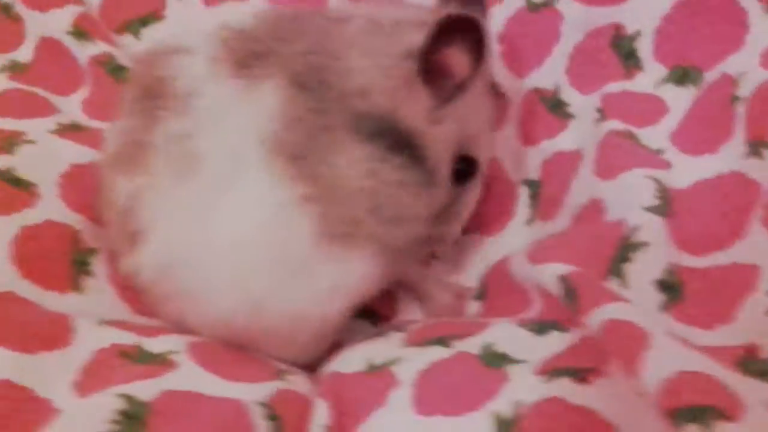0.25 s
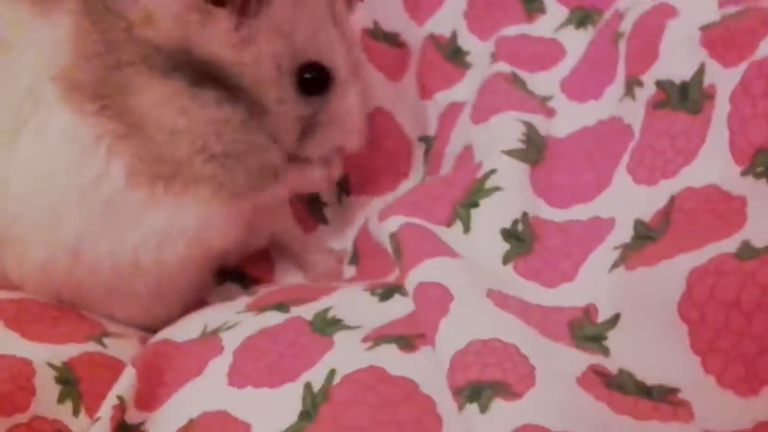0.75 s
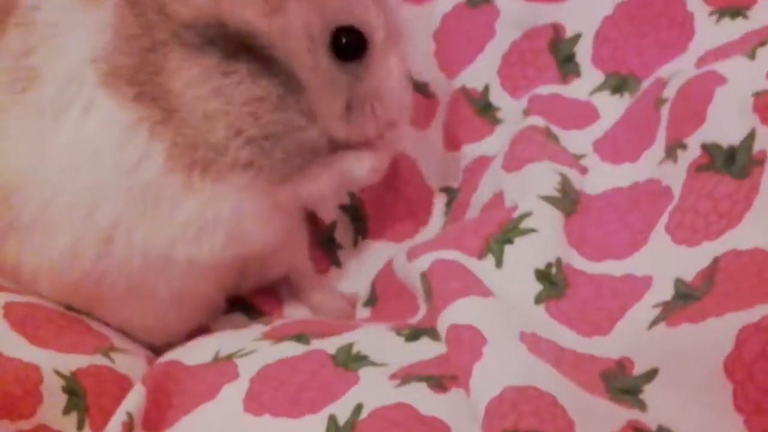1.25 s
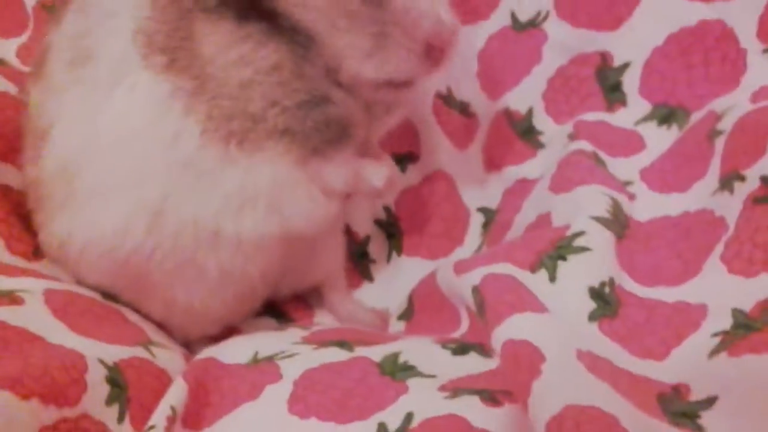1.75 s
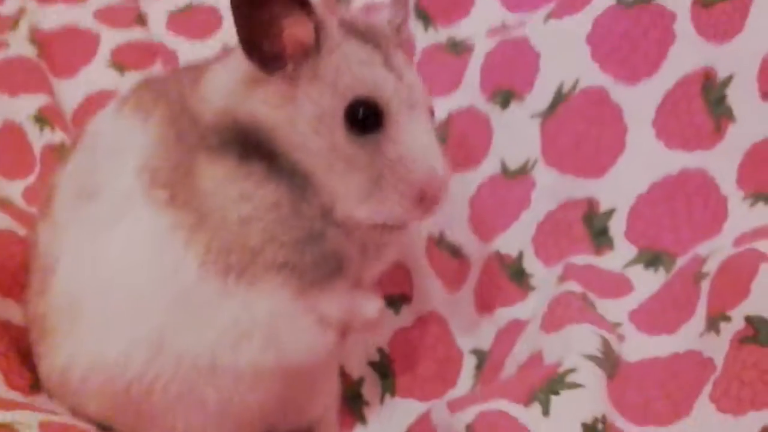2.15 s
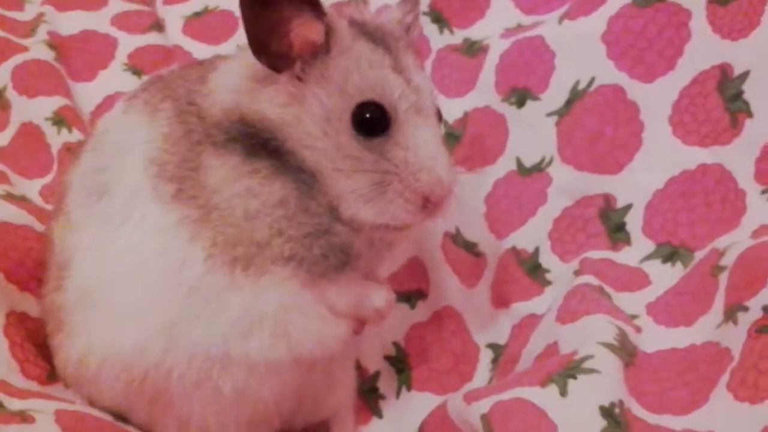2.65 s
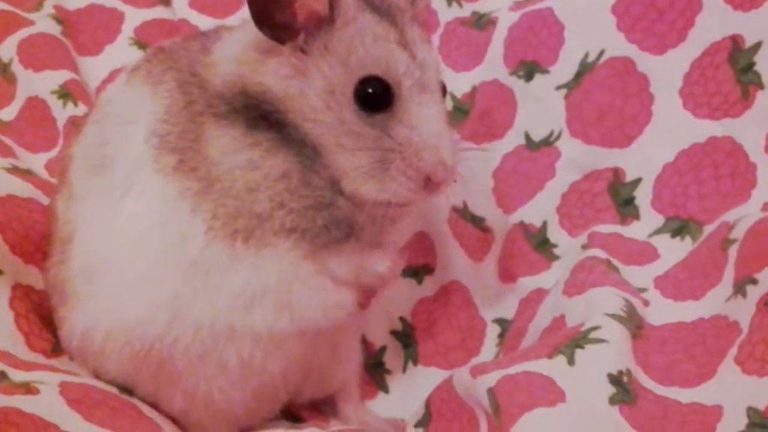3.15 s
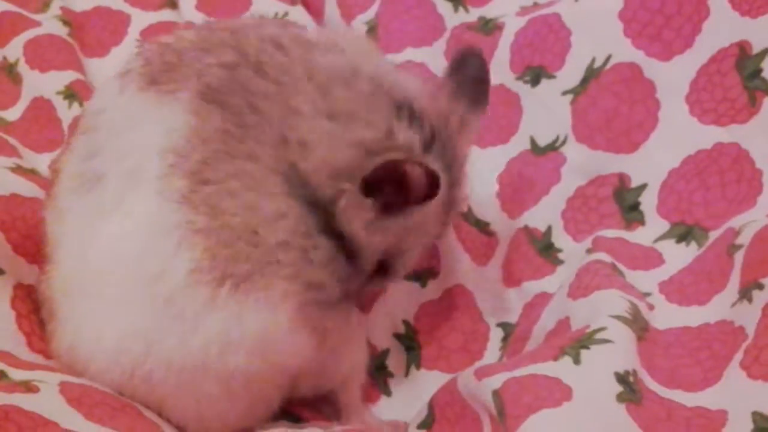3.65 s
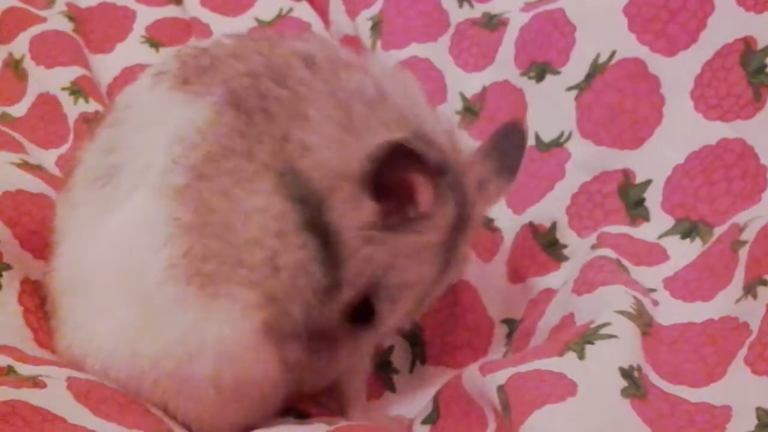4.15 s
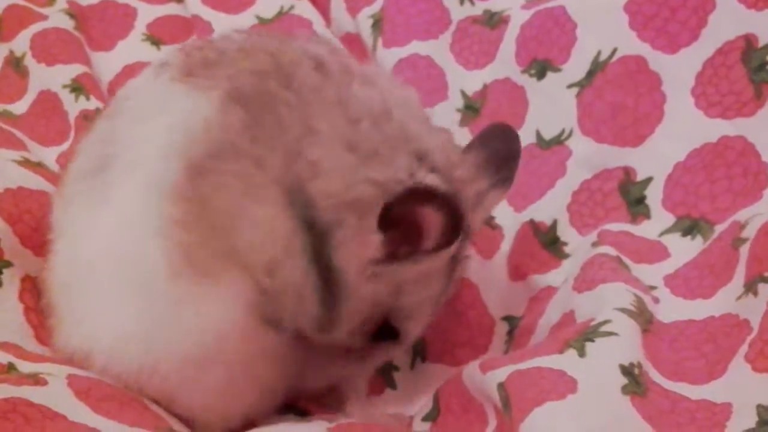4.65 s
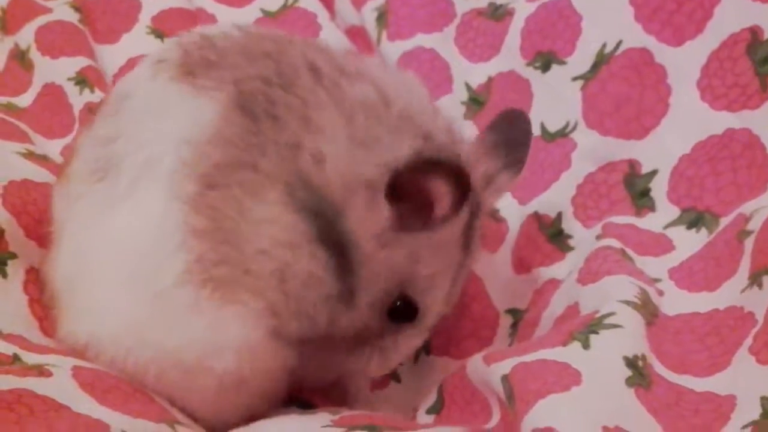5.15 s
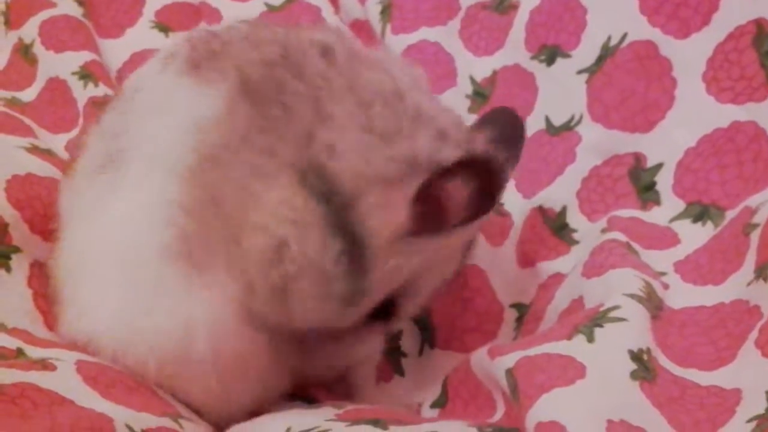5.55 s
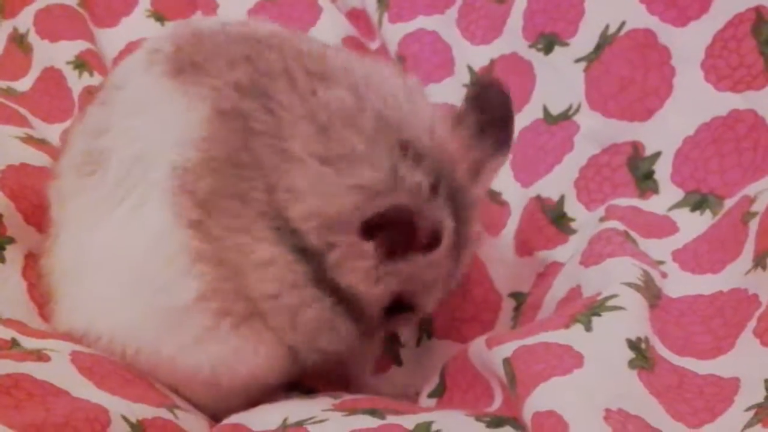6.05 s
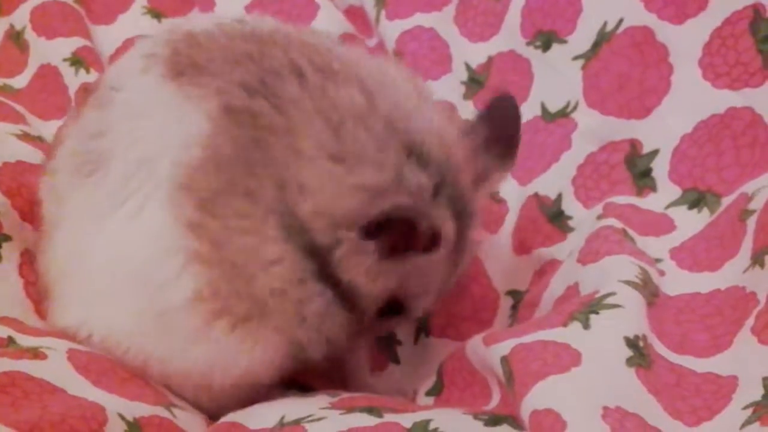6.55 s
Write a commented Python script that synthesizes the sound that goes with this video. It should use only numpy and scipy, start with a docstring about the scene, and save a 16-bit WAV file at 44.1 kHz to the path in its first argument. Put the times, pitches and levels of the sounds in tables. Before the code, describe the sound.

A loud handling knock and cloth swishes open, then creaky plastic grip clicks, soft scuffs and one tiny squeak over faint hiss.

```python
"""A hamster grooms itself on a cotton cloth, very close to a hand-held camera in a quiet room.
First a knock and cloth swishes (grainy friction noise) as the camera is moved in; hard ticks ring in a few
modes now and then, and the grip creaks in runs of stick-slip clicks. A sleeve then brushes past hollowly.
Finger scuffs (bursts of friction) and knocks follow, with one short squeak (a gliding sine) among them,
and late ticks. A faint hiss of shaped noise lies under all of it."""
import sys
import numpy as np
from scipy import signal
from scipy.fft import rfft, irfft, next_fast_len
from scipy.io import wavfile

SR = 44100
rng = np.random.default_rng(int(sys.argv[2]) if len(sys.argv) > 2 else 0)


def materialize(psi):
    """Save the field psi as 16-bit PCM at rate SR to the path in sys.argv[1].

    A 1-D psi becomes a single channel; in a 2-D psi each row is a channel.
    """
    bounded = np.clip(np.atleast_2d(psi).T, -1, 1)
    quanta = np.round(bounded * 32767).astype(np.int16)
    wavfile.write(sys.argv[1], SR, quanta)


N = 299645  # samples

# Steady noise of room and microphone. Each row: frequency in Hz, relative density in dB.
HISS_SPECTRUM = [(25, 0.5), (70, -2), (130, 0), (300, -3), (900, -0.5), (1500, -1.5), (2500, -5),
                 (4000, -12), (5500, -14.5), (7500, -11.5), (15500, -14)]
HISS_DB = -69.5  # rms level
# Light, continuous sliding over the cloth. Each row: time in seconds, swish level in dB.
SLIDE = [(0, -49), (0.26, -57.5), (0.6, -57.5), (0.76, -60), (0.87, -55), (1.0, -60.5), (1.125, -56.5),
         (1.165, -70), (1.225, -58), (1.41, -63), (1.565, -55.5), (1.61, -63), (1.71, -56.5), (1.87, -69),
         (1.98, -61.5), (2.33, -65), (2.5, -73), (2.7, -77.5)]
SLIDE_DRAG_DB, SLIDE_FIZZ_DB = -11, -11  # relative to the swish
# Hard rubs that swell and die. Each row: peak time, rise and fall in seconds, then the levels in dB of
# drag on the case, swish of the cloth and fizz of the fibres.
RUBS = [(0.008, 0.03, 0.14, -34.5, -34, -61), (0.114, .06, 0.12, -49.5, -48, -47.5),
        (1.97, 0.088, .11, -59.5, -68.5, -76), (2.1, 0.061, 0.1, -47, -56, -65.5),
        (2.21, 0.066, 0.13, -41, -50.5, -62), (2.296, 0.048, 0.05, -46, -47, -59),
        (2.565, 0.026, 0.054, -48, -53, -65), (2.602, 0.025, 0.023, -38, -55, -70)]
RUB_DEPTH_DB, RUB_SHAPE = 20.5, 1.4  # drop over one rise or fall time; how round the top is
# Spectra of the three friction layers. Each row: frequency in Hz, relative density in dB.
DRAG_SPECTRUM = [(60, -35.5), (150, -12), (300, -0.5), (550, -2), (1000, -6.5), (1800, -12.5), (3500, -28),
                 (9000, -45.5)]
SWISH_SPECTRUM = [(100, -23), (400, -10), (1300, -0.5), (2100, 0.5), (3300, -2.5), (4700, -6.5),
                  (5700, -12), (9000, -23.5), (15000, -35)]
FIZZ_SPECTRUM = [(3000, -24), (4600, 1), (5800, -6), (7000, 0.5), (8800, -4), (10500, -10), (15500, -18)]
# Resonances of the case and its microphone port. Each row: centre in Hz, width in Hz, peak in dB.
PORT_MODES = [(1995, 230, -10), (3050, 150, -13), (3900, 350, -6.5), (4830, 1700, -5.5)]
# Firm knocks on the case. Each row: time in seconds, peak in dB before the path through the case,
# ring in Hz, edge of the release in Hz.
BUMPS = [(0.0021, 0, 335, 2100), (3.3149, -20.5, 406, 790), (3.501, -18, 500, 1090),
         (4.3755, -25.5, 340, 1100), (5.8119, -28.5, 624, 1190)]
# How contacts travel through the case to the microphone. Each row: frequency in Hz, gain in dB.
CASE_RESPONSE = [(40, -14), (100, -4.5), (200, 2.5), (1000, -2), (3300, 1), (4000, 1), (4800, 6.5),
                 (6800, 0.5), (8000, -4.5), (11000, -8.5), (15500, -8)]
# Small hard ticks. Each row: start in seconds, peak in dB, ring in Hz, edge in Hz (high if sharp).
TICKS = [(0.019, -12.5, 4350, 14900), (0.175, -26.5, 1790, 7000), (0.8382, -22.5, 4460, 8300),
         (1.0369, -32, 4530, 9000), (1.5844, -42, 4446, 7060), (2.671, -49, 2300, 7000),
         (6.088, -47.5, 3500, 3490), (6.0899, -41, 4700, 4400), (6.464, -49.5, 3860, 4570),
         (6.466, -46, 4640, 5200)]
# What every tick rings with. Each row: multiple of its ring frequency, level in dB, t60 in seconds.
TICK_MODES = [(.4, -21, .009), (.62, -23, .005), (1, -3.5, 0.0091), (1.35, -14, .003), (1.83, -8, 0.002)]
# Creaks of the grip; a count of 1 is a lone knock. Each row: first and last slip in seconds, count,
# peak of the first slip in dB before the path through the case, ring in Hz, edge of the release in Hz.
CREAKS = [(0.0907, 0.0901, 1, -26, 270, 1600), (0.2726, 0.2723, 1, -36.5, 440, 2700),
          (0.5475, 0.5529, 2, -43.5, 168, 595), (0.5686, 0.5799, 2, -34, 410, 2400),
          (0.622, 0.691, 2, -39.5, 342, 4500), (0.8105, 0.8563, 3, -29.5, 390, 5120),
          (0.9216, 0.9643, 3, -27.5, 483, 4830), (0.9836, 1.0173, 3, -33.5, 343, 2900),
          (1.1159, 1.1372, 2, -28.5, 290, 5030), (1.2046, 1.2275, 3, -25.5, 272, 3160),
          (1.2359, 1.2701, 4, -35, 323, 940), (1.5661, 1.5768, 2, -38.5, 360, 2500),
          (1.7506, 1.7514, 1, -40, 360, 1410), (1.936, 1.9663, 4, -37, 262, 1610),
          (1.988, 2.013, 4, -36, 340, 1310), (2.0468, 2.0588, 2, -37.5, 480, 1100),
          (2.0759, 2.0759, 1, -18, 570, 2300), (2.085, 2.085, 1, -14.5, 580, 1970),
          (2.1047, 2.1296, 3, -14, 580, 2200), (2.1429, 2.1516, 2, -15, 534, 2120),
          (2.1667, 2.1769, 2, -13.5, 590, 2430), (2.2447, 2.2446, 1, -18, 470, 2900),
          (2.2758, 2.2815, 2, -18, 515, 1970), (2.2965, 2.2965, 1, -17, 540, 2570),
          (2.5471, 2.5674, 2, -33, 337, 2730), (2.5914, 2.6021, 2, -24, 450, 1500),
          (2.8714, 3.003, 2, -52, 380, 1400), (2.933, 2.9328, 1, -45.5, 539, 990),
          (5.578, 5.578, 1, -46, 500, 1194), (5.778, 5.778, 1, -44.5, 774, 1400)]
SLIP_FADE_DB = 0.8  # average fade per slip in dB
# Chance in a run: share of the gap, dB, octaves of edge.
SLIP_JITTER, SLIP_SPREAD_DB, EDGE_SPREAD = 0.12, 1.8, 0.3
# Echo inside the case: frequency of its dip in Hz, strength as a share, chance spread in octaves.
DIP_HZ, ECHO_SHARE, DIP_SPREAD = 4300, 0.45, 0.1
# A sleeve brushes past. Each row: time in seconds, level in dB.
BRUSH_LEVEL = [(2.33, -67.5), (2.355, -65), (2.385, -59.5), (2.44, -63), (2.46, -68.5), (2.51, -64),
               (2.55, -75)]
# Its narrow, hollow hiss. Each row: frequency in Hz, relative density in dB.
BRUSH_SPECTRUM = [(500, -40.5), (1300, -8.5), (1900, -13), (2300, -6), (2550, -4), (2850, -14), (3300, -33),
                  (8000, -38)]
# The hiss sinks as the sleeve slows. The pair holds the pitch ratio at the start and at the end.
BRUSH_GLIDE = (1.12, .94)
# Brief skids of a finger. Each row: start in seconds, starting level in dB before the path through
# the case, length in seconds.
SCUFFS = [(3.311, -43, 0.013), (3.331, -38.5, 0.008), (3.377, -31.5, 0.012), (3.5, -25.5, 0.012),
          (3.5459, -28.5, 0.01), (4.374, -38.5, 0.01), (5.806, -59.5, 0.014)]
RECATCH_AFTER, RECATCH_DB = 1.204, -8  # second catch: delay in lengths, relative level
# Noise of the skid. Each row: frequency in Hz, relative density in dB.
SCUFF_SPECTRUM = [(60, -49), (170, -7), (330, 2.5), (750, 6.5), (1200, -6.5), (2200, -5.5), (3100, -13.5),
                  (4300, -34.5), (8000, -27), (15500, -34)]
# The hollow of the case under the finger. Each row: centre in Hz, width in Hz, peak in dB.
HOLLOW_MODES = [(630, 170, -9.5), (870, 170, -9), (1310, 280, 5), (1890, 190, -7), (2740, 490, -9),
                (3600, 610, 1.5)]
# One squeak. Each row: time in seconds, pitch in Hz, level in dB, roughness (limited to 0-1 when used).
SQUEAK = [(5.235, 1920, -58.5, .9), (5.241, 2130, -47, 1.1), (5.2428, 3490, -55, 0.15),
          (5.250, 2060, -43.5, 0), (5.258, 1380, -50, 0.38), (5.265, 1360, -45, 0.26),
          (5.266, 2152, -39.5, 0), (5.271, 2240, -40, 0.02), (5.275, 1200, -60, .3)]
EDGE_HZ = 15750  # band limit of the whole sound


def gain_of(db):
    """Level law: decibels to amplitude."""
    return 10 ** (np.asarray(db) / 20)


def evened(x):
    """Normalisation of power: scales to rms 1."""
    return x / np.sqrt(np.mean(x ** 2) + 1e-20)


def add(mix, s, sound):
    """Superposition: adds a sound at time s; what falls outside is dropped."""
    start = round(s * SR)
    sound = sound[max(-start, 0):]
    part = mix[max(start, 0):][:len(sound)]
    part += sound[:len(part)]


def curve_gain(f, points):
    """Interpolation of a response, in decibels over log frequency, returned as amplitude."""
    hz, db = np.transpose(points)
    return gain_of(np.interp(np.log(f + 1), np.log(hz), db))


def coloured(x, points, modes=()):
    """Spectral shaping: a smooth spectrum raised by resonant peaks, at rms 1."""
    f = np.fft.rfftfreq(len(x), 1 / SR)
    peaks = sum(gain_of(db) / (1 + (2 * (f - centre) / width) ** 2) for centre, width, db in modes)
    return evened(irfft(rfft(x) * curve_gain(f, points) * (1 + peaks), len(x)))


def filtered(x, points):
    """Minimum-phase filtering: a causal response rings only after each sound, never before."""
    size = next_fast_len(2 * len(x))
    f = abs(np.fft.fftfreq(size, 1 / SR))
    log_gain = np.log(curve_gain(f, points))
    # the Hilbert transform of the log gain gives the phase
    response = np.exp(np.conj(signal.hilbert(log_gain)))[:size // 2 + 1]
    return irfft(rfft(x, size) * response, size)[:len(x)]


def wander(rate_hz):
    """Low-passed randomness: chance of rms 1 that changes up to about rate_hz."""
    f = np.fft.rfftfreq(N, 1 / SR)
    return evened(irfft(rfft(rng.standard_normal(N)) / (1 + (f / rate_hz) ** 4), N))


def friction(per_s, spread_db, smooth):
    """Random stick-slip: fibres catch and snap in uneven sizes over a share of smooth sliding noise."""
    sizes = gain_of(spread_db * np.minimum(rng.exponential(1, N), 4))
    signs = rng.choice([-1, 1], N)
    happens = rng.random(N) < per_s / SR
    return evened(sizes * signs * happens) + smooth * rng.standard_normal(N)


def slip(ring_hz, edge_hz, load, damping, size=2048):
    """Relaxation: force builds up and drops at once (mid-pulse), and the case swings, damped."""
    f = np.fft.rfftfreq(size, 1 / SR)
    s, u = 1j * f / ring_hz, 1j * f / edge_hz
    case = s ** 2 / (1 + damping * s + s ** 2)
    build_up = 1 / (1 - load * s)  # runs backward in time from the release
    edge = 1 / (1 + 1.6 * u + u ** 2)
    pulse = np.fft.fftshift(irfft(case * build_up * edge))
    return pulse / abs(pulse).max()


def hiss():
    """Stationary noise: steady hiss and low rumble of room and microphone."""
    return gain_of(HISS_DB) * coloured(rng.standard_normal(N), HISS_SPECTRUM)


def rubbing():
    """Addition of powers: light slide plus hard rubs give the strength of drag, swish and fizz."""
    t = np.arange(N) / SR
    slide_db = np.interp(t, *np.transpose(SLIDE), right=-np.inf)
    power = np.outer(gain_of([SLIDE_DRAG_DB, 0, SLIDE_FIZZ_DB]), gain_of(slide_db)) ** 2
    for s, rise, fall, *layers_db in RUBS:
        away = np.minimum(np.maximum((s - t) / rise, (t - s) / fall), 10)
        swell = gain_of(-RUB_DEPTH_DB * abs(away) ** RUB_SHAPE)
        power += np.outer(gain_of(layers_db), swell) ** 2
    return np.sqrt(power)


def cloth():
    """Dry friction: dull grainy drag under pressure, a lighter swish, and the fine fizz of fibres."""
    drag_level, swish_level, fizz_level = rubbing()
    unevenness = gain_of(1.0 * wander(rate_hz=78))  # 1 dB rms
    drag = drag_level * coloured(friction(per_s=900, spread_db=2.5, smooth=0.62), DRAG_SPECTRUM)
    swish_grain = friction(per_s=3000, spread_db=2.5, smooth=1.1)
    swish = swish_level * coloured(swish_grain, SWISH_SPECTRUM, PORT_MODES)
    fizz = fizz_level * coloured(friction(per_s=3000, spread_db=1.5, smooth=1.1), FIZZ_SPECTRUM)
    return unevenness * (drag + swish + fizz)


def bumps():
    """Impact: a knock as the camera starts to move, later ones as a finger lands, swing the case."""
    out = np.zeros(N)
    for s, db, ring_hz, edge_hz in BUMPS:
        # less damping than in a creak: a longer swing
        pulse = filtered(slip(ring_hz, edge_hz, load=0.48, damping=0.48), CASE_RESPONSE)
        add(out, s - len(pulse) / 2 / SR, -gain_of(db) * pulse)
    return out


def ticks(snap_db=-14, snap_s=0.0006, low_hz=600):
    """Modal excitation: a tiny snap and bright modes; a softer contact leaves the upper ones weak."""
    out, t = np.zeros(N), np.arange(SR // 40) / SR
    for s, db, hz, edge_hz in TICKS:
        ring = sum(gain_of(mode_db - 60 * t / t60) * np.sin(2 * np.pi * hz * ratio * t)
                   for ratio, mode_db, t60 in TICK_MODES)
        snap = gain_of(snap_db) * np.exp(-t / snap_s) * rng.standard_normal(len(t))
        band = signal.butter(3, [low_hz, min(edge_hz, SR / 2 - 1)], "bandpass", fs=SR, output="sos")
        tick = signal.sosfilt(band, ring + snap)
        add(out, s, gain_of(db) * tick / abs(tick).max())
    return out


def knock(ring_hz, edge_hz, shift):
    """Comb interference: one slip heard through the case, and its short echo, cancel at a dip."""
    pulse = filtered(slip(ring_hz, edge_hz, load=0.42, damping=1.0), CASE_RESPONSE)
    n = np.arange(len(pulse))
    delay = SR / (2 * DIP_HZ * 2 ** (DIP_SPREAD * shift))  # half a period of the dip, in samples
    echo = np.interp(n - delay, n, pulse)
    return (pulse + ECHO_SHARE * echo) / (1 + ECHO_SHARE)


def grip():
    """Stick-slip: the hand slips on the case in nearly even runs, of uneven strength, that tend to fade."""
    out = np.zeros(N)
    for first, last, count, db, ring_hz, edge_hz in CREAKS:
        count = round(count)
        early, louder, sharper, shift = rng.uniform(-1.2, 1, (count, 4)).T
        times = np.linspace(first, last, count)
        times[1:-1] += SLIP_JITTER * (last - first) / count * early[1:-1]
        for k, s in enumerate(times):
            later = k > 0  # the first slip keeps its given level and edge
            slip_edge_hz = edge_hz * 2 ** (later * EDGE_SPREAD * sharper[k])
            pulse = knock(ring_hz, slip_edge_hz, shift[k])
            level_db = db - SLIP_FADE_DB * k + later * SLIP_SPREAD_DB * louder[k]
            add(out, s - len(pulse) / 2 / SR, gain_of(level_db) * pulse)
    return out


def brush():
    """Resonant noise: smooth cloth sliding with a hollow spectrum that sinks slowly in pitch."""
    s, db = np.transpose(BRUSH_LEVEL)
    n = np.arange(N)
    level = gain_of(np.interp(n / SR, s, db, left=-np.inf, right=-np.inf))
    speed = np.interp(n / SR, [s[0], s[-1]], BRUSH_GLIDE)
    noise = coloured(rng.standard_normal(N), BRUSH_SPECTRUM)
    return level * np.interp(np.cumsum(speed), n, noise)  # varying read speed bends the pitch


def scuffs(fade_db=8, rise_s=0.0023):
    """Dense stick-slip: small slips start hard, die, and catch again as the finger comes to rest."""
    force = np.zeros(N)
    for s, db, length in SCUFFS:
        t = np.arange(int(2 * length * SR)) / SR
        stop = 1 / (1 + (t / length) ** 8)
        skid = gain_of(db - fade_db * t / length) * np.minimum(t / rise_s, 1) * stop
        add(force, s, skid)
        add(force, s + RECATCH_AFTER * length, gain_of(RECATCH_DB) * skid)
    grain = coloured(friction(per_s=5400, spread_db=1.5, smooth=1.0), SCUFF_SPECTRUM, HOLLOW_MODES)
    return filtered(force * grain, CASE_RESPONSE)


def squeak(octave_db=-28, rasp=0.99, flutter_hz=750):
    """Frequency and amplitude modulation: a raspy whistle leaps up, slides down, and jumps up again."""
    s, *columns = np.transpose(SQUEAK)
    t = np.arange(s[0], s[-1], 1 / SR)
    hz, db, rough = (np.interp(t, s, c) for c in columns)
    rough = np.clip(rough, 0, 1)
    phase = 2 * np.pi * np.cumsum(hz) / SR
    flutter = wander(flutter_hz)[:len(t)]
    octave = gain_of(octave_db) + rasp * rough * (1 - rough)  # strongest at half roughness
    tone = np.sin(phase) + octave * np.sin(2 * phase)
    out = np.zeros(N)
    add(out, s[0], np.sqrt(2) * gain_of(db) * tone * (1 - rough + rough * flutter))
    return out


def room(x, wet_db=-24, t60=0.09):
    """Diffuse reverberation: soft bedding leaves only a faint, short scatter after each sound."""
    t = np.arange(SR // 5) / SR
    tail = rng.standard_normal(len(t)) * gain_of(-60 * t / t60)
    return x + gain_of(wet_db) * signal.fftconvolve(x, tail / np.linalg.norm(tail))[:N]


def scene():
    """Superposition: contacts with their scatter, cloth and sleeve over the steady hiss."""
    contacts = bumps() + ticks() + grip() + scuffs() + squeak()
    return (hiss() + cloth() + room(contacts) + brush())[None]


def record(dry):
    """Saturation and band limiting: a full-scale limit, then a linear-phase low-pass."""
    low_pass = signal.firwin(511, EDGE_HZ, window=("kaiser", 9), fs=SR)
    return signal.oaconvolve(np.clip(dry, -1, 1), low_pass[None], "same")


dry = scene()
out = record(dry)
materialize(out)
```